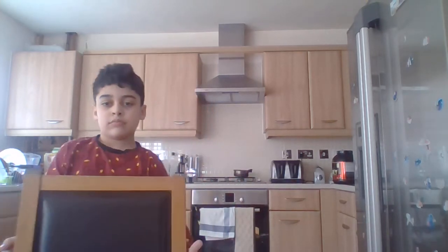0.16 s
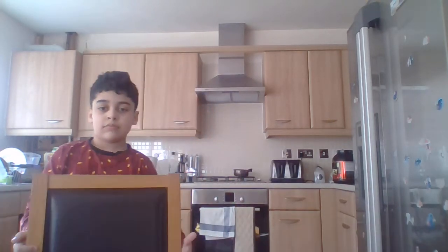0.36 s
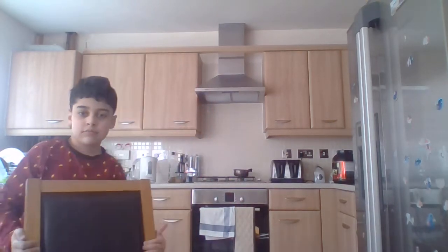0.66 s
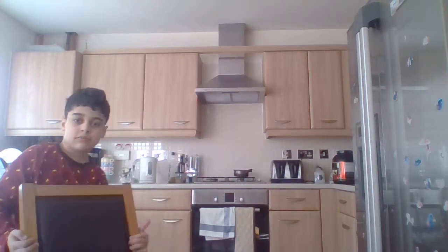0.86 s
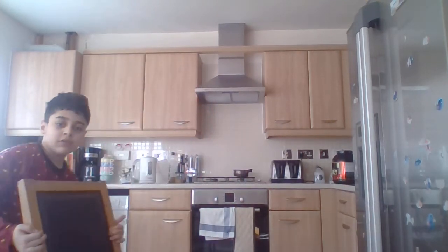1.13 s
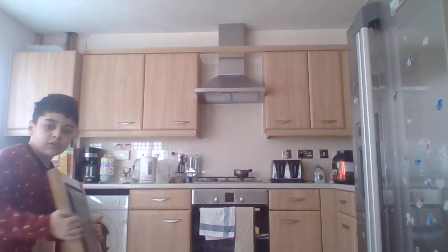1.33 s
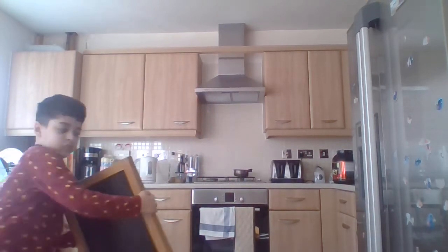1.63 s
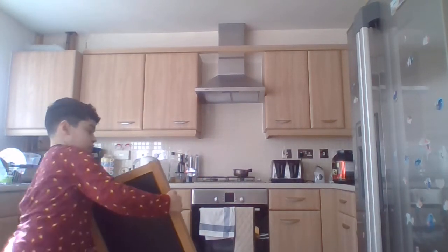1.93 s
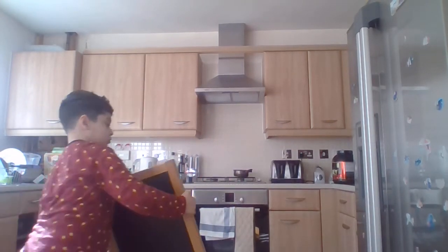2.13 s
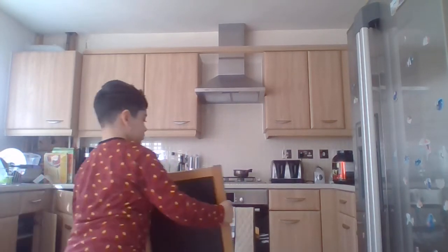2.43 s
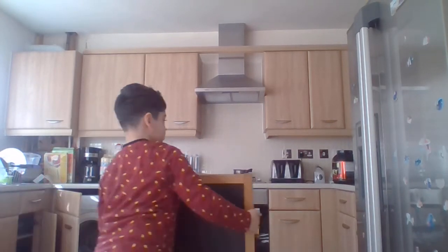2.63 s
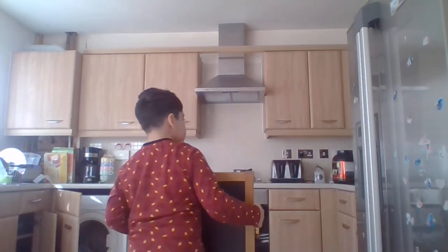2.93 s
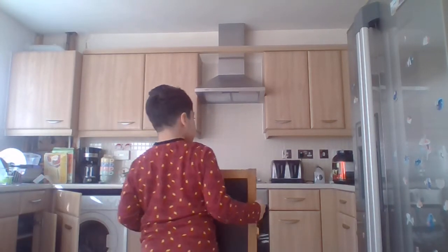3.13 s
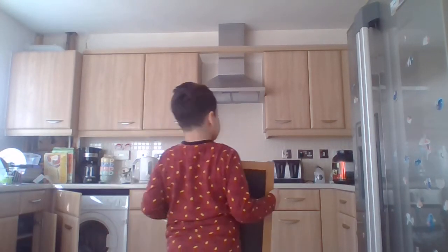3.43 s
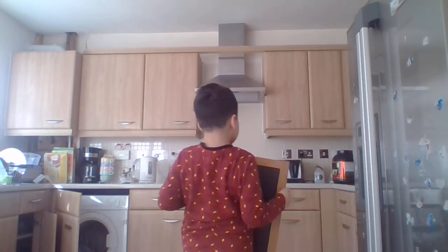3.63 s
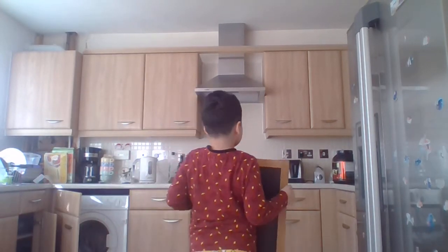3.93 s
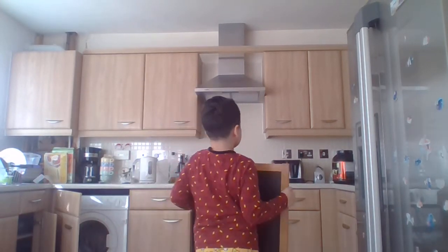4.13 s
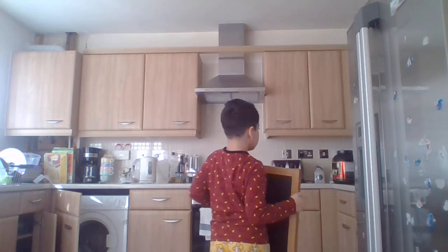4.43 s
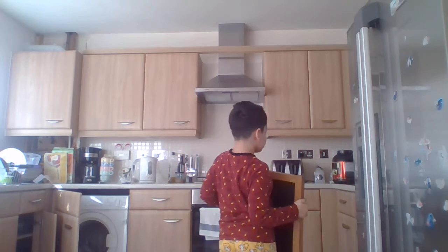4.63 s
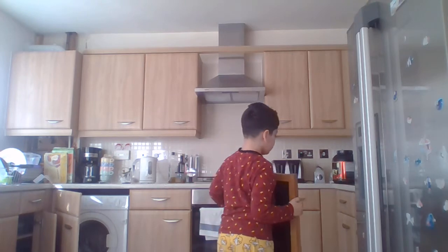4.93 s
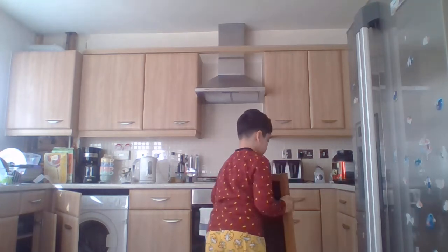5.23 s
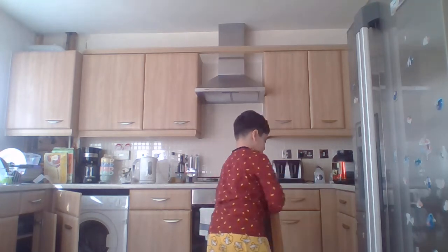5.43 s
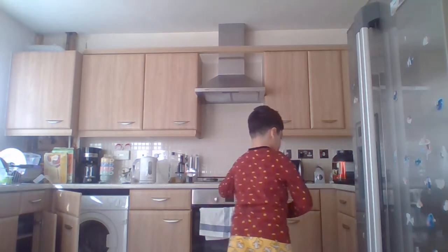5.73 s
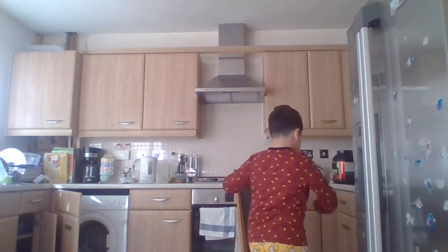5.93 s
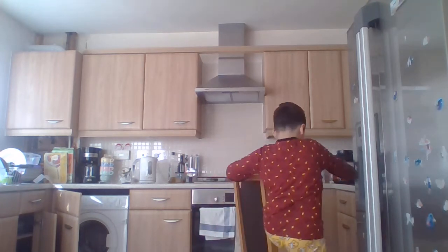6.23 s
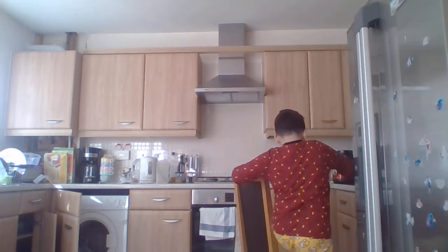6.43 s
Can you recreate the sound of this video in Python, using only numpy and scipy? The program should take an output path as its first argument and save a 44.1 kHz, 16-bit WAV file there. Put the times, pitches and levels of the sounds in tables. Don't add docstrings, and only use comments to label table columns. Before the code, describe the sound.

Hollow wooden clatter at the start, faint cloth and foot shuffles, and later dull chair-leg thumps over low hiss and electrical buzz.

```python
import sys
import numpy as np
from scipy import signal
from scipy.fft import rfft, irfft
from scipy.io import wavfile
from scipy.ndimage import uniform_filter1d

SR = 44100
rng = np.random.default_rng(int(sys.argv[2]) if len(sys.argv) > 2 else 0)


def decibels_to_gain(level_db):
    exponent = np.asarray(level_db, float) / 20
    return 10 ** exponent


def digitize_waveform(pressure):
    field = np.atleast_2d(pressure).T
    bounded = np.clip(field, -1, 1)
    quanta = np.round(bounded * 32767).astype(np.int16)
    wavfile.write(sys.argv[1], SR, quanta)


N = 289610

# start in seconds, strength in dB,
# treble (hardness) in dB, loudest ring in Hz, level of that ring in dB.
TOPPLE_BLOWS = [(1.560, -32, -13, 400, 0), (1.565, -21.5, -15, 735, -16), (1.570, -15.5, 0, 520, -1),
                (1.580, -12.5, -22, 760, -14), (1.595, -16.5, -8.5, 365, 0), (1.614, -22.5, -36, 445, 11),
                (1.667, -11.5, -10.5, 507, -18.5), (1.677, -24.5, -26.5, 820, -16),
                (1.699, -19, -7.5, 365, 5), (1.718, -17, -23.5, 455, 3.5), (1.748, -20, -17, 507, -4.5),
                (1.768, -24.5, -12.5, 380, 5), (1.792, -28.5, -21, 326, 3.5), (1.824, -33.5, -38, 427, -10)]
# start in seconds, strength in dB, treble (hardness) in dB,
# loudest ring in Hz, level of that ring in dB.
LEG_KNOCKS = [(-.022, -14.5, -21.5, 1015, -2), (-.004, -18.5, -19, 1538, 1.5),
              (2.641, -33.5, -32, 1093, -13), (4.125, -29.5, -48, 580, -1.5), (4.129, -24.5, -14, 633, -4),
              (4.138, -26.5, -34, 394, 12.5), (4.185, -31, -25, 426, 6), (4.243, -29.5, -25.5, 506, 4.5),
              (4.257, -30.5, -17.5, 572, 0), (4.303, -36, -36, 603, 0), (4.600, -26, -46, 284, 0),
              (4.602, -25.5, -7, 760, 4.5), (4.609, -19.5, -47, 425, -7), (5.133, -27.5, -21, 243, 7.5),
              (5.139, -25, -16, 940, -22), (5.159, -25, -19, 354, 2), (5.237, -43.5, -32, 265, 10),
              (5.631, -44.5, -34, 316, -25), (5.960, -50.5, -21.5, 242, -20), (6.345, -40.5, -10, 356, -2),
              (6.371, -35, -25, 1030, -1)]
# frequency in Hz, density in dB per Hz.
WOOD_SPECTRUM = [(44, -51), (80, -10.5), (157, -8.5), (437, -1), (834, -7), (1400, -8), (2970, -17),
                 (15500, -47.5)]
# frequency in Hz, level in dB, decay by 60 dB in seconds.
FRAME_MODES = [(144.6, -30, 0.15), (184.4, 11, 0.067), (228, 7, 0.087), (289, 6, 0.046), (365, 5, 0.097),
               (445, -9.5, 0.04), (507, -8, 0.32), (570, -5, 0.28), (677, -4, 0.12), (760, -2, 0.051),
               (857, 3, 0.058), (970, -3, 0.06), (1080, -14, 0.085), (1160, -35, 0.052), (1355, -26, 0.053),
               (1790, -12, 0.044)]
# start in seconds, level in dB.
JOINT_TICKS = [(.19, -51), (1.582, -39), (1.586, -23), (2.622, -44.5), (4.141, -45), (4.258, -44.5),
               (4.611, -54), (5.172, -42), (5.641, -53), (6.342, -47), (6.350, -41.5), (6.372, -47)]
# frequency in Hz, density in dB per Hz.
TICK_SPECTRUM = [(300, -26.5), (1500, 4.5), (4000, -1), (9000, -4.5), (15000, -5)]
# frequency in Hz, decay by 60 dB in seconds.
ROOM_DECAY = [(60, 0.25), (150, 0.57), (400, 0.46), (1000, 0.47), (2500, 0.46), (6000, 0.38), (14000, 0.34)]
# low edge in Hz, high edge in Hz,
# decay by 60 dB in seconds, level in dB.
HOUSE_BASS = (121.5, 275.5, 3.5, -42.5)
# start in seconds, sway in dB, thud in dB.
FLOOR_JOLTS = [(0.0, -39.5, -41), (0.162, -44, -47), (0.478, -46.5, -70), (0.771, -54, -71),
               (1.002, -35.5, -61), (1.191, -55, -65), (1.56, -32, -41), (1.67, -33.5, -46),
               (1.819, -61, -50), (2.602, -40, -42.5), (2.86, -60.5, -64), (3.2, -53, -61.5),
               (3.958, -49.5, -61), (4.13, -42.5, -38.5), (4.26, -68, -39), (4.599, -50, -39),
               (5.129, -45.5, -37), (5.281, -46, -62), (5.631, -55, -59), (5.73, -44, -68),
               (6.0, -48.5, -52), (6.349, -51, -45)]
# frequency in Hz, level in dB, decay by 60 dB in seconds.
JOIST_MODES = [(13.43, -6.5, 1.0), (16.8, 1, 1.26), (24, -24, 0.39)]
# frequency in Hz, level in dB, decay by 60 dB in seconds.
BOARD_MODES = [(42.1, 2, 0.39), (49.5, 0, 0.57), (62.6, -5, 0.41)]
# start in seconds, hold in seconds, shuffle in dB, fine rustle in dB.
MOVEMENTS = [(0.0, 0.13, -64, -70.5), (0.134, 0.022, -63, -62), (0.212, 0.097, -64.5, -66.5),
             (0.395, 0.17, -68.5, -80), (0.53, 0.092, -65.5, -73), (0.698, 0.26, -66.5, -74.5),
             (0.928, 0.11, -61, -69), (1.092, 0.1, -61.5, -69.5), (2.364, 0.011, -75, -95),
             (2.569, 0.018, -67.5, -80), (2.75, 0.027, -74.5, -78), (3.64, 0.026, -70.5, -75),
             (3.864, 0.0067, -71.5, -80.5), (4.26, 0.029, -71, -74), (4.935, 0.23, -70.5, -75.5),
             (5.18, 0.16, -66, -67), (5.36, 0.038, -66, -66), (5.942, 0.017, -76.5, -86),
             (6.107, 0.011, -83, -77)]
# frequency in Hz, density in dB per Hz.
SHUFFLE_SPECTRUM = [(120, -28), (200, -5.5), (323, 0), (591, -5), (1150, -0.5), (1310, -5.5), (1800, -2),
                    (2680, -7), (9000, -19), (11700, -44.5), (19800, -120)]
# frequency in Hz, width in Hz, level in dB.
BOARD_SQUEAK = (1400, 90, -19)
# frequency in Hz, width in Hz, level in dB, # fade
# in dB per second squared.
SQUEAK_TAIL = (1414, 48, -74.5, 6)
# frequency in Hz, level in dB.
BUZZ_OVERTONES = [(30, -78), (60, -71), (120, -73.5), (180, -86), (240, -93.5), (330, -83), (420, -87),
                  (600, -100)]
# frequency in Hz, density in dB per Hz.
HISS_SPECTRUM = [(41, -15), (70, -21.5), (162, -4.5), (232, -16.5), (341, -21.5), (721, -17), (789, -19.5),
                 (1060, -20.5), (1630, -20.5), (2340, -24), (4210, -31), (8700, -33.5), (9960, -36),
                 (11200, -32.5), (15700, -28)]
# frequency in Hz, width in Hz, level in dB.
NOISE_HUMPS = [(2070, 560, -81.5), (10070, 590, -84), (13400, 410, -94), (15500, 550, -87)]
# frequency in Hz, level in dB.
CIRCUIT_LINES = [(3047, -91), (6089, -94.5), (8000, -91), (9135, -102), (10002, -99), (15606, -91)]


def chair():
    lead = 2000
    spots = np.zeros((5, lead + N + 4097))
    straight = np.zeros(lead + N + 4097)

    for k, (start_s, *how) in enumerate(sorted(TOPPLE_BLOWS + LEG_KNOCKS)):
        into_room, direct = blow(*how)
        at = lead + round(start_s * SR)
        spots[k % 5, at:at + len(into_room)] += into_room
        straight[at:at + len(direct)] += direct

    for k, (start_s, db) in enumerate(JOINT_TICKS):
        click = tick(db)
        at = lead + round(start_s * SR)
        spots[k % 5, at:at + len(click)] += click
        straight[at:at + len(click)] += decibels_to_gain(-7.0) * click

    late_bass = house(spots.sum(0))[:len(straight)]
    reflected = sum(signal.fftconvolve(spot, kitchen())[:len(spot)] for spot in spots)
    return (straight + late_bass + reflected)[lead:][:N]


def blow(db, treble_db, ring_hz, ring_db):
    hz, t = np.fft.rfftfreq(8192, 1 / SR), np.arange(4097) / SR
    bass_db = -14.5 - 0.64 * (db + 11)

    tilt = [(150, bass_db + 11), (400, 0.003), (700, 0.0016),
            (1600, 0.2 * (treble_db + 28.5)), (5000, treble_db + 13.0)]
    click = causal(np.maximum(read(WOOD_SPECTRUM, hz), -90) + read(tilt, hz))
    dull = signal.lfilter(*signal.butter(1, 1200, fs=SR), click)
    click = dull + signal.fftconvolve(click - dull, scuff(0.0019))[:len(t)]

    mode_hz, mode_db, t60 = np.transpose(FRAME_MODES)[:, :, None]
    level_luck, pitch_luck = rng.standard_normal((2, len(FRAME_MODES), 1))
    mode_db = mode_db + 5.5 * level_luck + read([(150, bass_db), (400, 0.0068)], mode_hz)
    mode_hz = mode_hz * (1 + 0.02 * pitch_luck)
    modes = (decibels_to_gain(mode_db - 60 * t / t60) * np.sin(2 * np.pi * mode_hz * t)).sum(0)

    ring = (1 - np.exp(-t / 0.003)) * decibels_to_gain(-60 * t / 0.052) * np.sin(2 * np.pi * ring_hz * t)

    def scaled(part, relative_db):
        return decibels_to_gain(db + 15.5 + relative_db) * part / np.linalg.norm(part)

    ring = scaled(ring, ring_db)
    into_room = scaled(click, 0) + scaled(modes, -5.0) + decibels_to_gain(-8.0) * ring
    return into_room, decibels_to_gain(-8.5) * ring


def tick(db):
    colour = causal(read(TICK_SPECTRUM, np.fft.rfftfreq(1024, 1 / SR)))
    return decibels_to_gain(db + 6.0) * np.convolve(colour / np.linalg.norm(colour), scuff(0.0006))


def scuff(length_s):
    t = np.arange(600) / SR
    z = rfft(rng.standard_normal(len(t)) * (t / length_s + 0.097) * np.exp(-t / length_s))
    run = irfft(z / abs(z)) * np.exp(-t / (4 * length_s))
    return run / np.linalg.norm(run)


def kitchen():
    slots = np.arange(60, SR - 16, 16)
    taps = np.zeros(SR)
    sign = rng.choice([-1., 1.], len(slots))
    at = slots + rng.integers(0, 16, len(slots))
    taps[at] = sign * decibels_to_gain(2.47 * rng.standard_normal(len(slots)))

    hz, t, z = signal.stft(taps, SR, nperseg=512)
    decay = decibels_to_gain(-60 * t / read(ROOM_DECAY, hz)[:, None])
    tail = signal.istft(z * decay, SR, nperseg=512)[1][:SR]
    tail = tail * (1 - np.exp(-np.arange(SR) / SR / 0.0056))
    tail = tail / np.linalg.norm(tail)

    tail[0] = decibels_to_gain(-9.0)
    tail[rng.integers(40, 900, size=6)] += decibels_to_gain(-12.0) * rng.choice([-1., 1.], size=6)
    return tail


def house(blows):
    low_hz, high_hz, t60, db = HOUSE_BASS
    t = np.arange(2 * SR) / SR
    bass_band = signal.butter(4, (low_hz, high_hz), "band", fs=SR, output="sos")
    tail = signal.sosfilt(bass_band, rng.standard_normal(len(t)))
    tail = tail * decibels_to_gain(-60 * t / t60) * np.minimum(t / 0.058, 1)
    return decibels_to_gain(db) * signal.fftconvolve(blows, tail / np.linalg.norm(tail))


def desk():
    murmur = decibels_to_gain(-61.5) * band(18.6, 14.6) + decibels_to_gain(-76) * band(45, 23.0)
    sway = floor_ring(column=1, modes=JOIST_MODES, rise_s=0.014)
    thud = floor_ring(column=2, modes=BOARD_MODES, rise_s=0.022)
    return murmur + sway + thud


def floor_ring(column, modes, rise_s):
    t, pushes = np.arange(SR) / SR, np.zeros(N)
    for row in FLOOR_JOLTS:
        pushes[round(row[0] * SR)] = decibels_to_gain(row[column])
    ring = sum(decibels_to_gain(db - 60 * t / t60) * np.sin(2 * np.pi * hz * t) for hz, db, t60 in modes)
    return signal.fftconvolve(pushes, ring * (1 - np.exp(-t / rise_s)) ** 2)[:N]


def rustle():
    grain = evened(decibels_to_gain(evened(uniform_filter1d(rng.standard_normal(N), 300))))
    squeak_hz, squeak_width, squeak_db = BOARD_SQUEAK
    shuffle = noise(lambda f: read(SHUFFLE_SPECTRUM, f))
    coarse = (shuffle + decibels_to_gain(squeak_db) * band(squeak_hz, squeak_width)) * grain

    fine_spectrum = [(2500, -49), (5000, -11), (8000, -3), (15000, -0.5), (17000, 0.5)]
    fine = noise(lambda f: read(fine_spectrum, f)) * grain
    return motion(column=2, fade_db_per_s=82) * coarse + motion(column=3, fade_db_per_s=113) * fine


def motion(column, fade_db_per_s):
    rise_s = 0.051
    rows, t = np.array(MOVEMENTS), np.arange(0, N + 64, 64) / SR
    since = t - rows[:, :1]
    after_hold = np.maximum(since - rise_s - rows[:, 1:2], 0)
    gain = np.clip(since / rise_s, 0, 1) * decibels_to_gain(rows[:, column, None] - fade_db_per_s * after_hold)
    return np.interp(np.arange(N) / SR, t, np.sqrt((gain ** 2).sum(0)))


def squeak_tail():
    hz, width, db, fade = SQUEAK_TAIL
    return decibels_to_gain(db - fade * (np.arange(N) / SR) ** 2) * band(hz, width)


def buzz():
    hz = 29.862 * np.arange(1, 21)[:, None]
    since_pulse = 0.0334 - np.arange(N) / SR
    return (decibels_to_gain(read(BUZZ_OVERTONES, hz) + 1.0) * np.sin(2 * np.pi * hz * since_pulse)).sum(0)


def hiss():
    t = np.arange(N) / SR
    floor = decibels_to_gain(-69.5) * noise(lambda f: read(HISS_SPECTRUM, f))
    humps = sum(decibels_to_gain(db) * band(hz, width) for hz, width, db in NOISE_HUMPS)
    lines = sum(decibels_to_gain(db + 1.5) * np.sin(2 * np.pi * (hz * t + rng.random())) for hz, db in CIRCUIT_LINES)
    return floor + humps + lines


def noise(gain_db):
    spectrum = rfft(rng.standard_normal(N)) * decibels_to_gain(gain_db(np.fft.rfftfreq(N, 1 / SR)))
    return evened(irfft(spectrum, N))


def band(hz, width):
    return noise(lambda f: -20 * np.log10(1 + (2 * (f - hz) / width) ** 2))


def causal(gain_db):
    full = np.concatenate([gain_db, gain_db[-2:0:-1]]) * np.log(10) / 20
    return np.fft.ifft(np.exp(np.conj(signal.hilbert(full)))).real[:len(gain_db)]


def read(points, hz):
    f, value = np.transpose(points)
    return np.interp(np.log(hz + 1), np.log(f + 1), value)


def evened(x):
    return x / np.sqrt(np.mean(x ** 2) + 1e-20)


def scene():
    return (chair() + desk() + rustle() + squeak_tail() + buzz() + hiss())[None]


def top_cut(x):
    return signal.sosfilt(signal.butter(12, 15820, fs=SR, output="sos"), x)


def record(dry):
    return top_cut(dry)


dry = scene()
out = record(dry)
digitize_waveform(out)
```